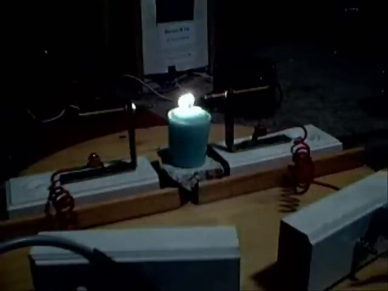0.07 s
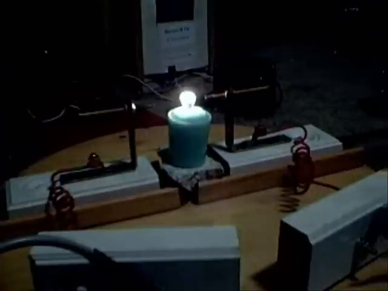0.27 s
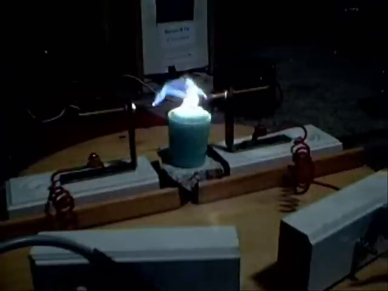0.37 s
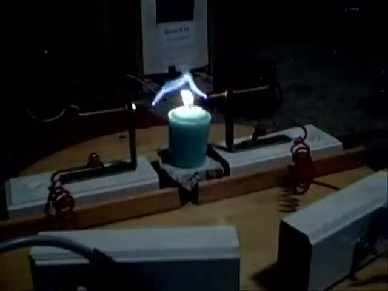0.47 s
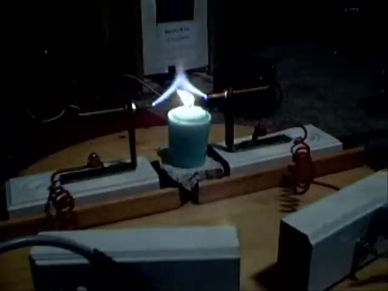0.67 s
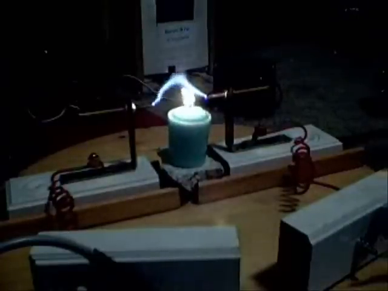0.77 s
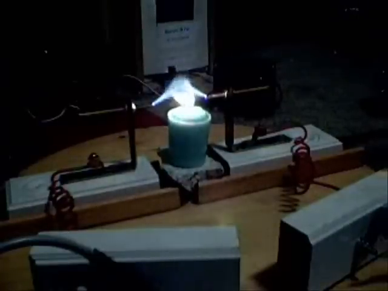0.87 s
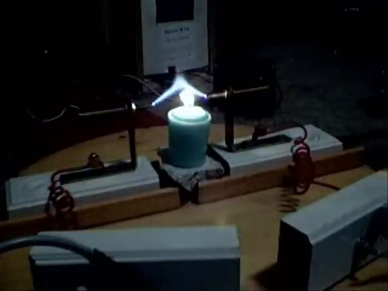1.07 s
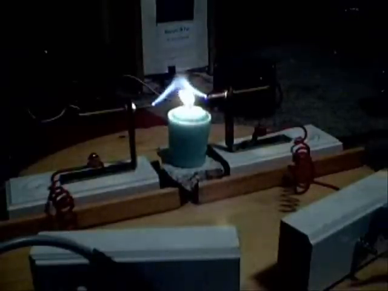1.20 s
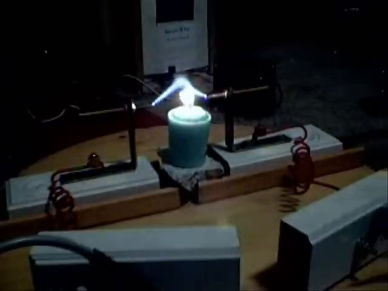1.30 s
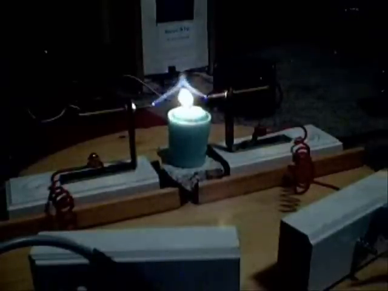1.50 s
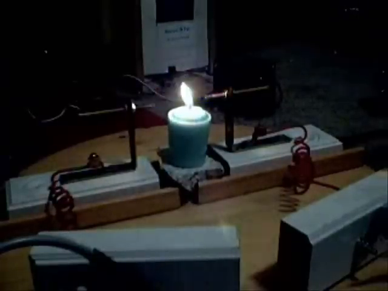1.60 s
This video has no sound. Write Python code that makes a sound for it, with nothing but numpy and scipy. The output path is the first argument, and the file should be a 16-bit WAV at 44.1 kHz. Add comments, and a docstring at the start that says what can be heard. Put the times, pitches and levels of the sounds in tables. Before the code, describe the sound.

A high-voltage arc strikes with a sharp crack at 0.2 seconds, after a faint hum and soft rustle. It buzzes harshly and sizzles over a low transformer hum, flaring brightest around 0.3 seconds, then steadying. At about 1.35 seconds a switch clicks and the arc and hum stop. A soft thump, a rustle and a faint metallic tink follow by 1.5 seconds, over the small room's quiet hiss.

```python
"""A high-voltage arc strikes through a candle flame in a small, quiet room and burns for about a second.
It relights on every half cycle of the mains: a buzz of sharp sparks, a sizzle of tiny ones, a low hum.
The transformer hums faintly beforehand, and a switch clicks the supply off.
Soft handling noises come before and after, over the room's rumble and hiss."""
import sys
import numpy as np
from scipy import signal
from scipy.fft import rfft, irfft, next_fast_len
from scipy.io import wavfile
from scipy.ndimage import uniform_filter1d, map_coordinates

SR = 44100
rng = np.random.default_rng(int(sys.argv[2]) if len(sys.argv) > 2 else 0)


def pcm_store(signal):
    """Save signal as 16-bit PCM."""
    levels = np.round(np.clip(np.atleast_2d(signal), -1, 1) * 32767)
    wavfile.write(sys.argv[1], SR, levels.astype(np.int16).T)


N = 72765

MAINS_HZ = 59.98
ON_S, OFF_S = 0.2055, 1.346  # the arc strikes and goes out
RELIGHT_S = 0.0012  # delay of the relighting within each half cycle


def arc():
    """The gap cracks as it breaks down, then buzzes and sizzles, with brief bright flares."""
    # fierceness of the arc: time_s, level_db
    fierceness = [(.21, -33), (.245, -40.5), (.268, -30.5), (.305, -35), (.325, -37), (.39, -38),
                  (.485, -42.5), (.515, -38), (.565, -38.5), (.62, -41.5), (.69, -42.5), (.715, -39.5),
                  (.765, -41.5), (.795, -39), (.885, -39.5), (.93, -40), (1.02, -40), (1.06, -38.5),
                  (1.22, -40), (1.255, -42.5), (1.335, -38.5)]
    # cracks as the gap first breaks down: start_s, relative_db
    cracks = [(.2057, -7.5), (0.211, -5.5), (0.2138, 0.5), (0.2182, -21)]
    # flares of sizzle: centre_s, level_db, width_s
    flares = [(.217, -41, 0.0025), (0.298, -34.5, 0.0082), (0.355, -31, 0.0048), (0.412, -40, 0.0055),
              (0.524, -41, 0.0057), (0.559, -36, 0.0082), (0.712, -46, 0.0057), (0.809, -38, 0.0031),
              (1.343, -40.5, .006)]
    # colour of the steady sparks: freq_hz, gain_db
    spark_colour = [(100, -8), (500, -6.5), (950, -12.5), (1500, -9.5), (2000, -11), (2700, -2),
                    (3300, 1.5), (3800, -1.5), (4350, 3.5), (5500, -5), (6200, 1), (7100, 1), (7700, -2),
                    (8300, -2), (9500, -5.5), (11000, -4), (12400, -6.5), (15000, -4.5)]
    # brighter colour of flares and cracks: freq_hz, gain_db
    flare_colour = [(100, -11.5), (1300, -4), (2200, 0), (4000, 0.5), (6500, 1), (8300, 6), (9600, -0.5),
                    (12000, 1), (15000, -0.5)]
    t = clock()
    lit = (t > ON_S) * (t < OFF_S)
    burning = amp(-4) * buzz(scatter_db=3) + amp(-2.5) * sizzle(scatter_db=4.5)
    burning *= amp(np.interp(t, *np.transpose(fierceness)))
    flaring = swells(flares) * sizzle(scatter_db=0.5)
    crack_s, crack_db = np.transpose(cracks)
    breakdown = pulses(crack_s, amp(crack_db - 4))
    sparks = coloured(lit * burning, spark_colour) + coloured(lit * flaring + breakdown, flare_colour)
    return room(sparks, wet_db=6, near_db=6, near_t60_s=0.013)


def buzz(scatter_db, sparks_per_volley=5):
    """A volley of sparks relights the arc each half cycle; each spark and polarity drifts on its own."""
    restrike_s, loss_db = 0.0014, 0.3  # mean gap and mean drop from one spark to the next
    drift_s, jitter_s = 0.00009, 0.00002
    half_cycle = np.arange(int(2 * MAINS_HZ * N / SR))
    t = half_cycle / (2 * MAINS_HZ)
    polarity = (-1) ** half_cycle
    volleys = np.zeros(N)
    for spark in range(sparks_per_volley):
        delay_s = RELIGHT_S + restrike_s * (spark + rng.uniform(-0.303, 0.302))
        drift = wobble(t, 4.945) + 0.39 * polarity * wobble(t, 3.96)
        times = t + delay_s + drift_s * drift + jitter_s * rng.standard_normal(len(t))
        sizes = amp(scatter_db * rng.standard_normal(len(t)) - loss_db * spark)
        volleys += pulses(times, sizes)
    return unit(volleys)


def sizzle(scatter_db, sparks_per_s=3200):
    """Tiny random sparks, stronger while the current peaks."""
    fires = rng.random(N) < sparks_per_s / SR
    sizes = amp(scatter_db * rng.standard_normal(N)) * rng.choice([-1, 1], N)
    current = 1 + 0.62 * np.cos(2 * np.pi * 2 * MAINS_HZ * (clock() - RELIGHT_S))
    return unit(fires * sizes * current)


def supply(rise_s=0.038, fall_s=0.0095):
    """The transformer idles, then the loaded hum swells, shifts as the arc heats and dies at switch-off."""
    # hum of the burning arc: mains_multiple, level_at_ignition_db, slope_db_per_s
    arc_hum = [(2, -58, 0), (4, -58, 0), (6, -51, 1), (8, -62, 3), (10, -50, -10), (12, -62.5, 0.5)]
    # hum of the idling transformer: mains_multiple, level_at_ignition_db, slope_db_per_s
    idle_hum = [(2, -63, 11), (6, -61.5, -2)]
    t = clock()
    load = 1 - np.exp(-np.maximum(t - ON_S, 0) / rise_s)
    powered = np.exp(-np.maximum(t - OFF_S, 0) / fall_s)
    return powered * (load * hum(arc_hum) + (1 - load) * hum(idle_hum))


def hum(harmonics, lag_s=0.006, waver_db=0.7):
    """Mains harmonics in step give one push each half cycle; each slides and wavers in level."""
    t = clock()
    phase = 2 * np.pi * MAINS_HZ * (t - lag_s)
    tone = np.zeros(N)
    for multiple, db, slope in harmonics:
        level_db = db + slope * (t - ON_S) + waver_db * wobble(t, 8.7)
        tone += amp(level_db) * np.cos(multiple * phase)
    return np.sqrt(2) * tone


def switch(rise_s=0.0011, pivot_hz=1700):
    """A light bright touch, then the contacts snap over and ring the housing."""
    # hits of the contacts: start_s, level_db, tilt_db_per_octave
    contacts = [(1.3385, -28, 14), (1.341, -17.5, -5)]
    # modes of the housing: pitch_hz, relative_db, t60_s
    housing = [(600, -26.5, 0.058), (904, -26.5, 0.034), (1556, 0, 0.013), (1670, -4, 0.015),
               (2000, -6, 0.016), (2550, -1.5, 0.012), (3015, -1, .008)]
    click = np.zeros(N)
    for start_s, hit_db, tilt in contacts:
        attack = (1 - np.exp(-np.maximum(clock() - start_s, 0) / rise_s)) ** 2
        for hz, mode_db, t60_s in housing:
            gain = amp(hit_db + mode_db + tilt * np.log2(hz / pivot_hz))
            click += gain * attack * ring(start_s, hz, t60_s)
    return room(click, wet_db=-2.5, near_db=-14, near_t60_s=0.03)


def handling():
    """Soft rustles, low thumps and one faint metallic tink."""
    # rustles: centre_s, level_db, width_s
    rustles = [(0.057, -58.5, 0.037), (0.197, -65, 0.029), (1.545, -58.5, 0.027)]
    # their midrange colour: freq_hz, gain_db
    rustle_colour = [(100, -7), (350, -10.5), (750, 0.5), (1200, -5), (3000, -17.5), (12000, -32)]
    # thumps: centre_s, level_db, width_s
    thumps = [(.2, -62, 0.038), (1.389, -53.5, 0.037), (1.53, -64, 0.022)]
    # their bassy colour: freq_hz, gain_db
    thump_colour = [(20, -17), (45, -12), (68, -7), (95, -8.5), (150, -23), (1000, -69)]
    tink = amp(-54) * ring(start_s=1.518, hz=2771, t60_s=0.13)
    return swells(rustles) * noise(rustle_colour) + swells(thumps) * noise(thump_colour) + tink


def room_tone():
    """The quiet room's steady rumble and hiss."""
    # colour of the room tone: freq_hz, gain_db
    colour = [(20, -1.5), (42, -9.5), (65, -7), (110, -13.5), (210, -18), (400, -13), (630, -16.5),
              (1260, -21), (2820, -22), (8000, -25), (15400, -27)]
    return amp(-53.5) * noise(colour)


def room(x, wet_db, near_db, near_t60_s):
    """Direct sound, quick reflections off the bench and the room's tail, with no overall colour."""
    # decay of the room: freq_hz, t60_s
    decay = [(200, 0.27), (2000, 0.22), (6000, 0.19), (15000, 0.12)]
    hz, t, bands = signal.stft(rng.standard_normal(SR // 2), SR, nperseg=256)
    tail = signal.istft(bands * amp(-60 * t / along(decay, hz)[:, None]), SR, nperseg=256)[1]
    near = rng.standard_normal(len(tail)) * amp(-60 * np.arange(len(tail)) / SR / near_t60_s)
    impulse = amp(wet_db) * tail / np.linalg.norm(tail) + amp(near_db) * near / np.linalg.norm(near)
    impulse[0] += 1  # direct sound
    response = rfft(impulse, 2 * len(impulse))
    smooth_power = np.abs(uniform_filter1d(np.abs(response) ** 2, size=300))
    neutral = irfft(response / np.sqrt(smooth_power))[:len(impulse)]
    return signal.fftconvolve(x, neutral)[:N]


def amp(db):
    """Decibels to gain."""
    return 10 ** (np.asarray(db) / 20)


def unit(x):
    """Scale to rms 1."""
    return x / np.sqrt(np.mean(x ** 2) + 1e-20)


def clock():
    """Time of each sample in seconds."""
    return np.arange(N) / SR


def along(points, hz):
    """Read a (freq_hz, value) curve on a log frequency axis."""
    freqs, values = np.transpose(points)
    return np.interp(np.log(hz + 1), np.log(freqs + 1), values)


def wobble(t, knots_per_s):
    """A smooth random curve at times t."""
    return map_coordinates(rng.standard_normal(256), [np.abs(t) * knots_per_s], mode="mirror")


def coloured(x, colour):
    """Minimum-phase EQ through (freq_hz, gain_db) points that keeps the power of white noise."""
    size = 2 * next_fast_len(N)
    gain = unit(amp(along(colour, np.fft.rfftfreq(size, 1 / SR))))
    cepstrum = irfft(np.log(gain))
    cepstrum[1:size // 2] *= 2  # folded so that nothing rings ahead of a spark
    cepstrum[size // 2 + 1:] = 0
    return irfft(rfft(x, size) * np.exp(rfft(cepstrum)))[:N]


def noise(colour):
    """Coloured noise of rms 1."""
    return unit(coloured(rng.standard_normal(N), colour))


def pulses(times, sizes, half_taps=8):
    """Sharp windowed-sinc pulses placed between samples."""
    centres = np.asarray(times)[:, None] * SR
    taps = np.floor(centres).astype(int) + np.arange(1 - half_taps, half_taps + 1)
    shape = np.sinc(taps - centres) * np.cos(np.pi * (taps - centres) / (2 * half_taps)) ** 2
    return np.bincount(np.clip(taps, 0, N).ravel(), (shape * sizes[:, None]).ravel(), N + 1)[:N]


def ring(start_s, hz, t60_s):
    """One struck mode: a decaying sine."""
    age = np.maximum(clock() - start_s, 0)
    return np.sin(2 * np.pi * hz * age) * amp(-60 * age / t60_s)


def swells(events):
    """An envelope with one bell-shaped rise and fall per event."""
    t = clock()
    return sum(amp(db) * np.exp(-0.5 * ((t - centre_s) / width_s) ** 2) for centre_s, db, width_s in events)


def scene():
    """The arc, its supply, the switch and the handling over the room tone, in mono."""
    return (arc() + supply() + switch() + handling() + room_tone())[None]


def record(dry):
    """A brick-wall low-pass takes off the very top of the treble."""
    cutoff_hz = 15480
    size = next_fast_len(N + SR // 2)
    passband = np.fft.rfftfreq(size, 1 / SR) < cutoff_hz
    return irfft(rfft(dry, size) * passband, size)[:, :N]


dry = scene()
out = record(dry)
pcm_store(out)
```